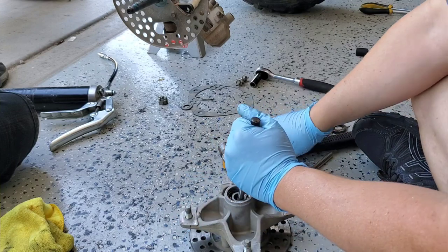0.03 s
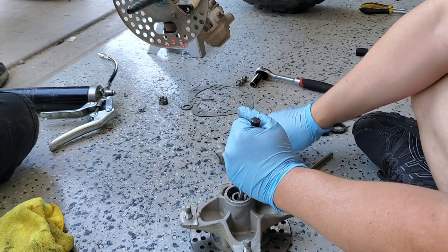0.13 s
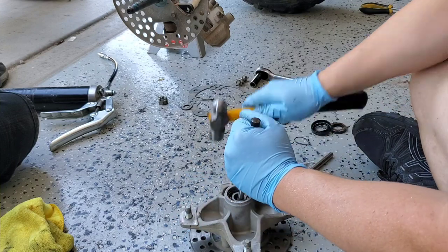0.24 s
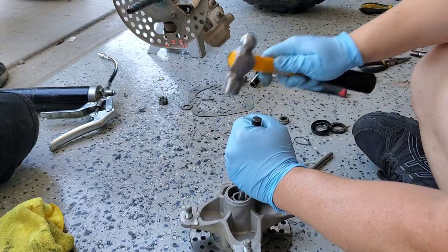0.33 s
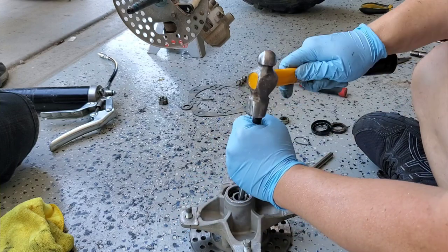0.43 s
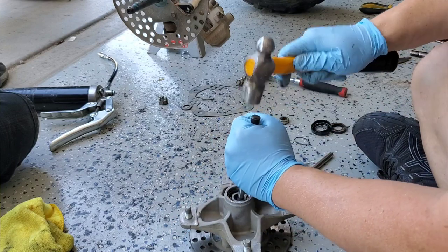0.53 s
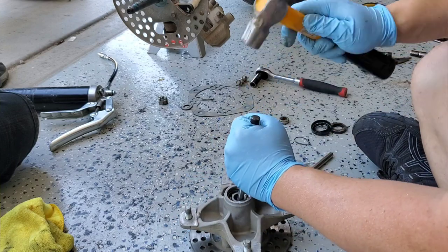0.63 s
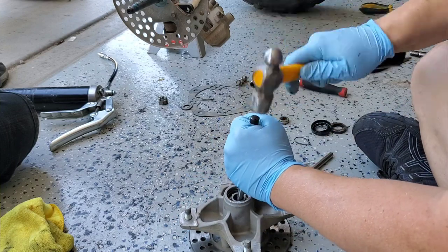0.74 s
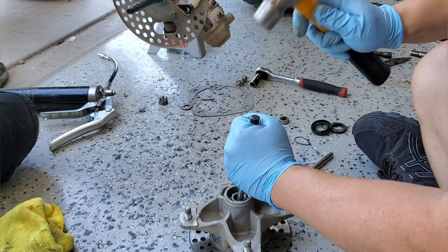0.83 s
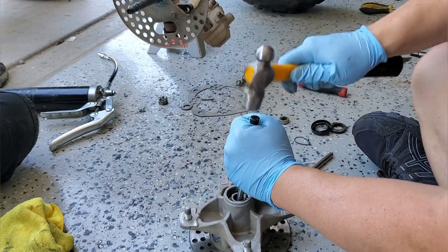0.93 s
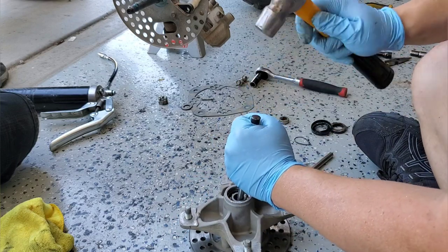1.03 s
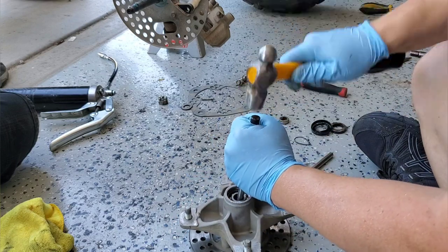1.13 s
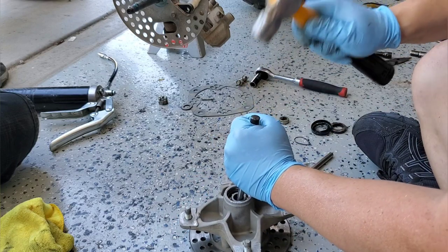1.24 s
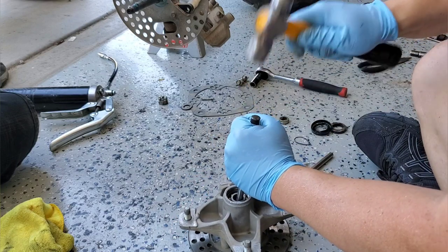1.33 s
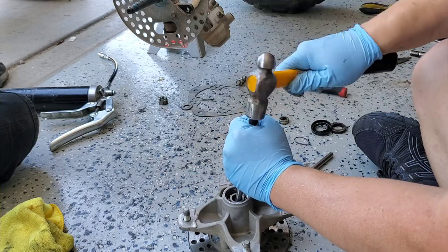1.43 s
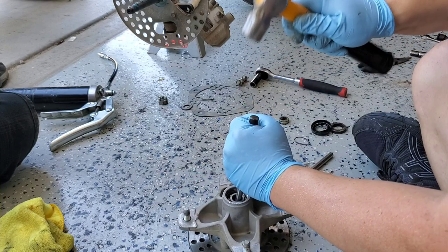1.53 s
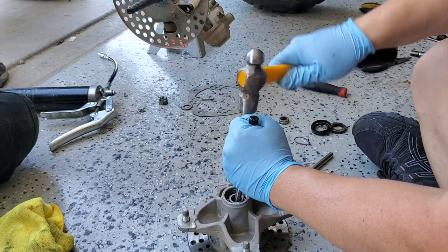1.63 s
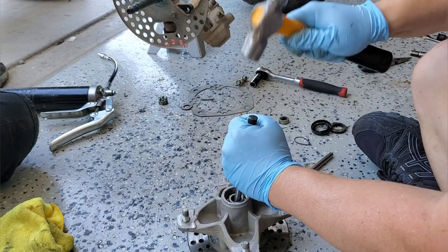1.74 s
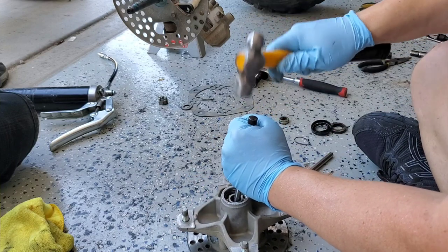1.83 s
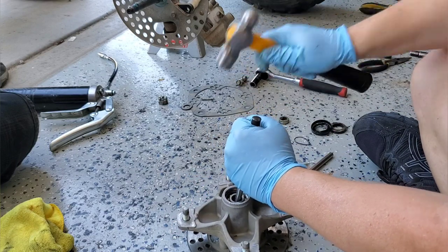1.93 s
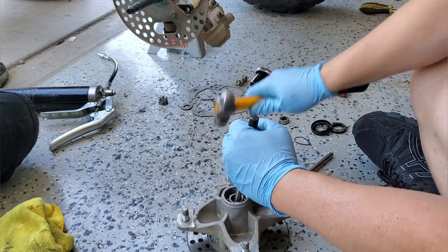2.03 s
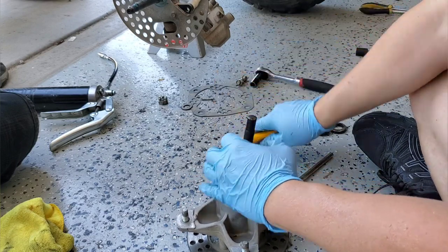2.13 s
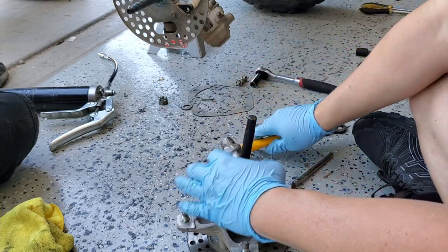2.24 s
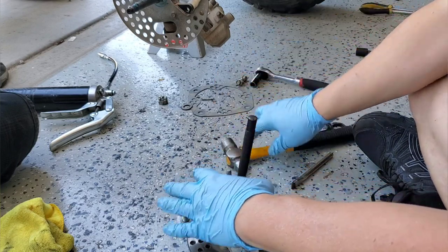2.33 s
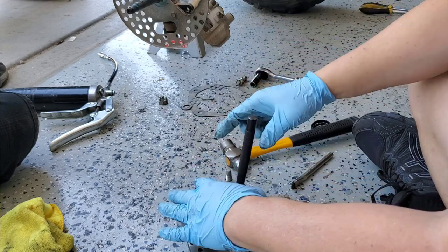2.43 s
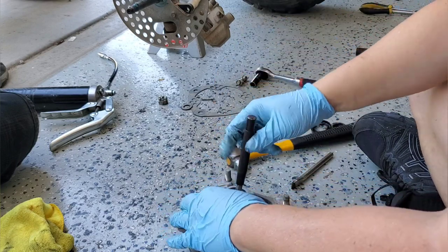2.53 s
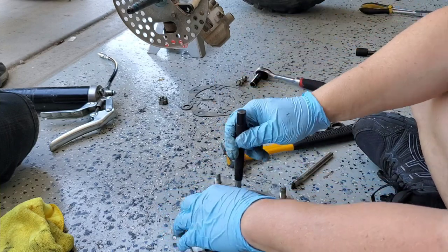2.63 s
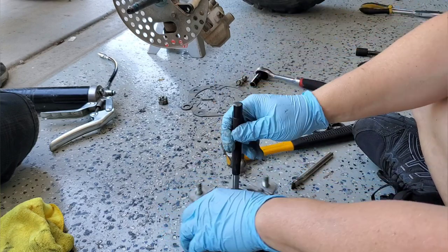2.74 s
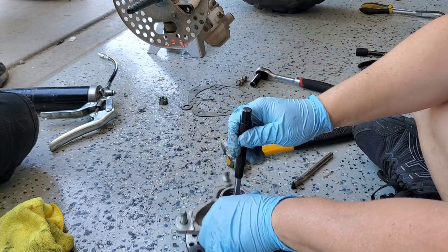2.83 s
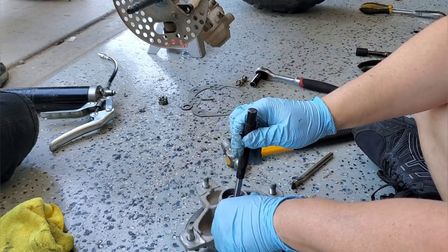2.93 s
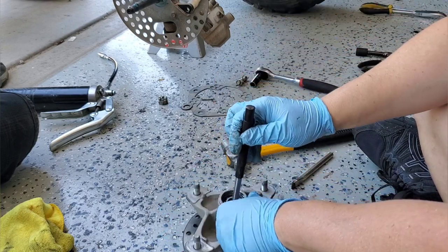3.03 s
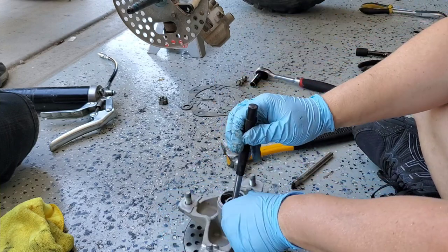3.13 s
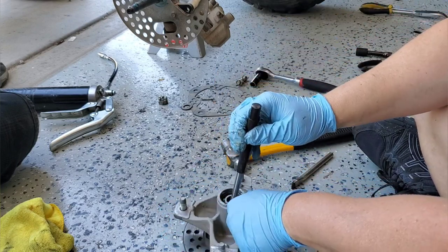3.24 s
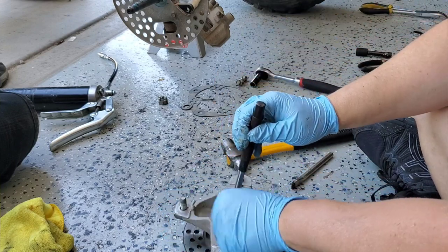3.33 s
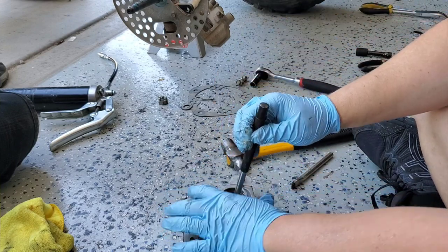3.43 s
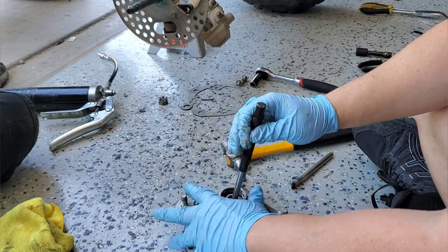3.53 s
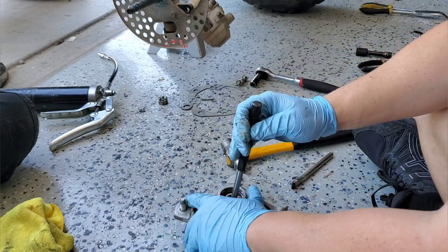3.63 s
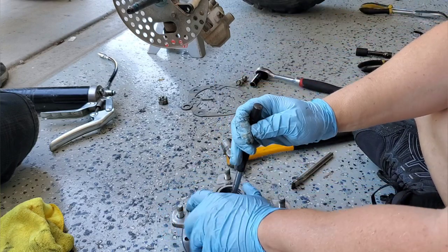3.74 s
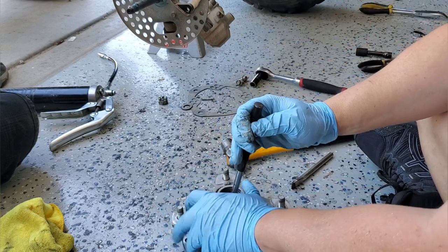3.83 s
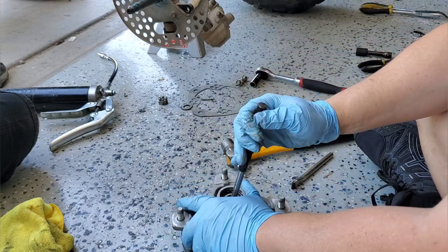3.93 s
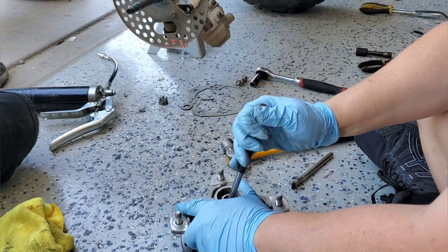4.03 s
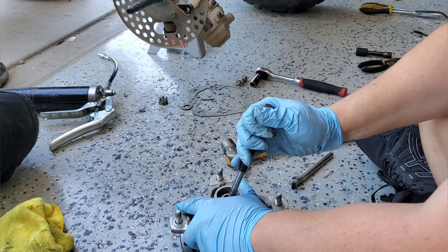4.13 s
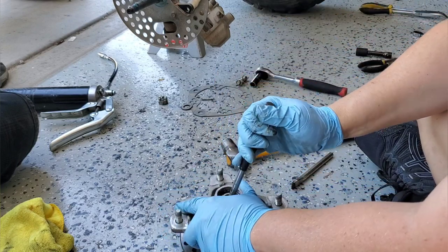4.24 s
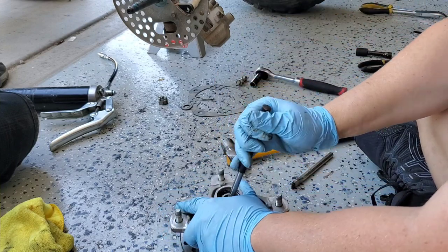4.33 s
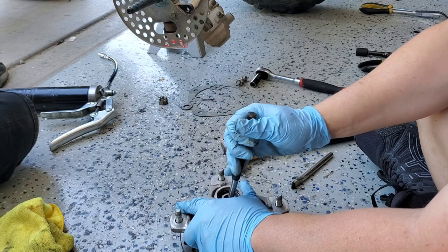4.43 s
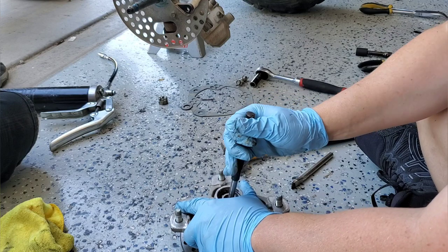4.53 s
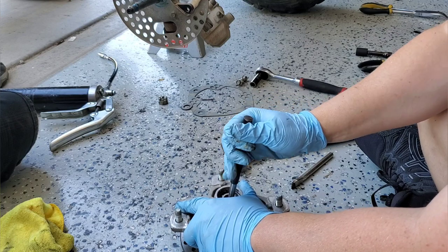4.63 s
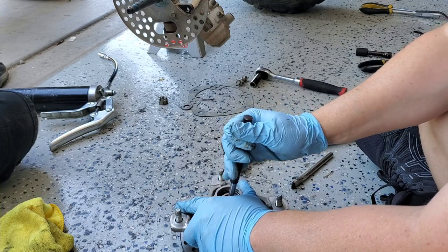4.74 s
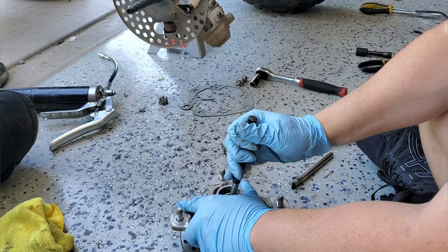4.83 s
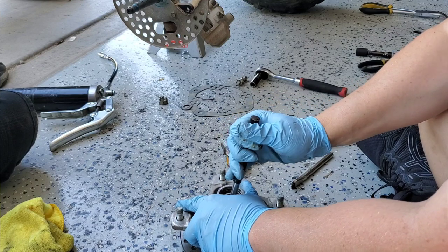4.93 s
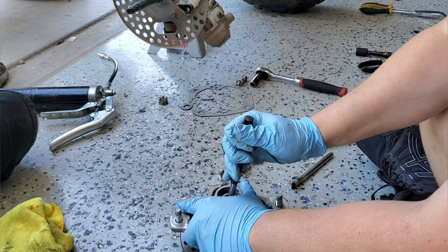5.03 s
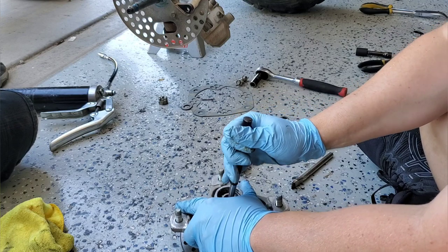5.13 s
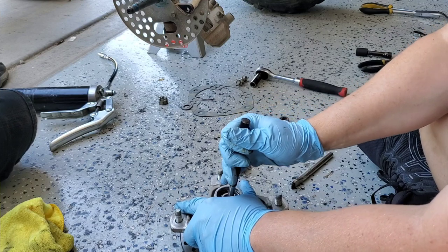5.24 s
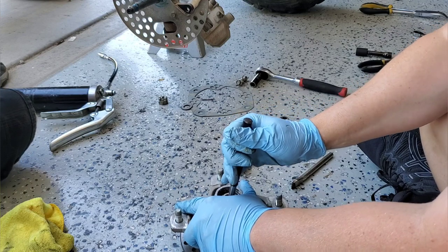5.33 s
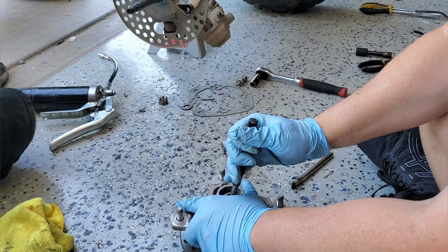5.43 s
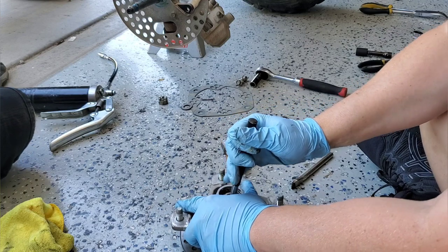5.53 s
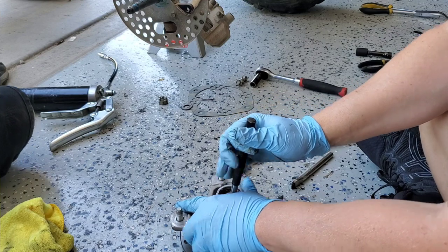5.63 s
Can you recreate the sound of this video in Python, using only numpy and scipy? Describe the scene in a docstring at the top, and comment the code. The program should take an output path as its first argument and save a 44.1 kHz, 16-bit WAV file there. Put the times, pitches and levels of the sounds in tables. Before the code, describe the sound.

Close by in a garage, eight loud, bright hammer strikes ring off a steel punch, about five a second. As the ringing fades, the hammer knocks softly onto the concrete floor. Quiet metallic clicks and scrapes follow as the punch shifts in a wheel hub, with one sharper click and finally a hollow metal clunk. Rubber gloves rustle faintly over a distant motor hum.

```python
"""A hammer drives a steel punch against the bearing in a wheel hub on a garage floor: eight ringing blows, each
a noisy clank plus the modes of hammer, punch and hub. The hammer is laid on the concrete; the punch ticks and
scrapes about in the bore and finally levers the sleeve sideways, so that it jumps in the bore with a hollow
clunk. Gloves rustle, a motor hums far off in a low rumble, and a limiter ducks under the blows."""
import sys
import numpy as np
from scipy import signal
from scipy.fft import rfft, irfft
from scipy.io import wavfile
from scipy.ndimage import uniform_filter1d, minimum_filter1d

SR = 44100
rng = np.random.default_rng(int(sys.argv[2]) if len(sys.argv) > 2 else 0)


def unload_audio(sound):
    """Save the sound as a 16-bit wav file, at the path given as the first command line argument."""
    columns = np.transpose(np.atleast_2d(sound))
    # keep every value between -1 and 1, then stretch to whole-number steps
    steps = np.round(np.clip(columns, -1, 1) * 32767)
    wavfile.write(sys.argv[1], SR, steps.astype(np.int16))


N = 251370
TIME = np.arange(N) / SR

# modes of the steel punch, the hub and the air in the bore: f/Hz, level/dB, t60/s, left minus right/dB
PUNCH_MODES = [(4990, -40, .22, 12), (5469, -26, .25, 10), (5641, -19, .25, 13), (5738, -31, .7, 10),
               (8758, -23, .22, 10), (10109, -18, .24, -6), (12187, -24, .27, 12), (13102, -24, .23, 4)]
HUB_MODES = [(1757, -51.5, 3.6, 0), (3768, -22, .27, 11), (3913, -28, .25, 12), (4013, -43, 2.0, 8),
             (5292, -41, .8, 3), (5662, -43, 2.0, 9), (7181, -38, .25, 7), (8403, -29, .2, -2),
             (8532, -28, .2, 0), (9240, -20, .19, -1), (9383, -27, .24, -7), (9668, -32, .26, 6),
             (9781, -27, .21, 10), (11622, -31, .2, 5), (11875, -30, .22, 7), (12360, -24, .2, 8),
             (14798, -32, .22, 2), (14841, -37, .26, 10), (15606, -32, .2, 3), (15735, -36, .22, -3)]
BORE_MODES = [(1120, 2, .055, 6), (1215, -4, .04, 6), (1390, -10, .03, 6), (1560, -5, .04, 6),
              (1790, -11, .03, 6)]
# stereo balance of the two microphone ports: f/Hz, left minus right/dB
PORT_BALANCE = [(100, 1), (300, 2), (1200, 2.4), (2400, 14), (4200, 3), (7000, 12), (9500, 8.3),
                (15000, 13)]
# how alike the two ports sound: f/Hz, correlation/0-1
PORT_LIKENESS = [(100, 0.93), (300, 0.83), (700, 0.23), (2000, 0.39), (4500, 0.18), (15000, 0.047)]
SHAFT_TILT_DB = -16   # per octave: the punch rings darker when it is not hammered


def from_db(db):
    """Decibels to gain."""
    return 10 ** (np.asarray(db) / 20)


def between(ends, share):
    """A value part of the way from one end to the other."""
    return ends[0] + (ends[1] - ends[0]) * np.clip(share, 0, 1)


def at_hz(points, hz):
    """Read a table on a log-frequency axis."""
    freqs, values = np.transpose(points)
    return np.interp(np.log(hz + 1), np.log(freqs), values)


def panned(db):
    """Left and right gains for a level difference."""
    return from_db(np.array([[.5], [-.5]]) * db)


def fade(t, t60):
    """Free decay: 60 dB in t60 seconds."""
    return np.exp(-np.log(1000) * t / t60)


def drift(per_s):
    """A random wander of spread about 1."""
    return np.interp(TIME * per_s, np.arange(4096), rng.standard_normal(4096))


def add(out, s, sound):
    """Mix a sound in from a given moment."""
    start = round(s * SR)
    out[:, start:start + sound.shape[1]] += sound[:, :N - start]


def dull(x, edge_hz):
    """Roll the treble off gently."""
    return signal.sosfilt(signal.butter(1, edge_hz, fs=SR, output="sos"), x)


def thin(x, edge_hz=950):
    """Small parts and narrow openings radiate little bass."""
    return signal.sosfilt(signal.butter(3, edge_hz, "high", fs=SR, output="sos"), x + 1e-18)


def noise(spectrum, size):
    """Stereo noise of a given colour as the two ports hear it; about rms 1."""
    hz = np.arange(size // 2 + 1) * SR / size
    mid, side = rfft(rng.standard_normal((2, size)))
    alike = at_hz(PORT_LIKENESS, hz)
    colour = from_db(at_hz(spectrum, hz))
    ports = np.sqrt((1 + alike) / 2) * mid + np.sqrt((1 - alike) / 2) * side * [[1], [-1]]
    return irfft(ports * panned(at_hz(PORT_BALANCE, hz)) * colour / np.sqrt(np.mean(colour ** 2)), size)


def burst(spectrum, t60, tilt_db=0):
    """Countless damped modes struck at once: fast-dying noise, its colour tilted by tilt_db an octave."""
    size = 8192
    hz, t = np.arange(size // 2 + 1) * SR / size, TIME[:size]
    envelope = fade(t, t60) * (1 - np.exp(-t / .0004))
    strike = rfft(noise([(100, 0), (16000, 0)], size) * envelope)
    power = uniform_filter1d(np.abs(strike) ** 2, size=25)
    even = strike * np.sqrt(power.mean() / power)   # iron out chance peaks and dips
    colour = from_db(at_hz(spectrum, hz) + tilt_db * np.log2(hz + 1))
    colour /= np.sqrt(np.mean(colour ** 2))
    return irfft(even * colour * panned(at_hz(PORT_BALANCE, hz)))[:, :size // 2]


def ring(modes, scatter_db=1.3, tilt_db=0, hold=1):
    """One stroke on a body: mode levels scatter and tilt (dB per octave); hold scales the ring time."""
    longest_s = max(mode[2] for mode in modes) * hold
    t = TIME[:int(min(longest_s, 2) * SR)]
    out = np.zeros((2, len(t)))
    for (hz, db, t60, pan_db), (luck, lag) in zip(modes, rng.standard_normal((len(modes), 2))):
        age = t[:int(t60 * hold * SR) + 1]
        # short waves reach the two ports out of step
        skew = lag * np.arccos(at_hz(PORT_LIKENESS, hz)) * np.array([[.5], [-.5]])
        gain = from_db(db + scatter_db * luck + tilt_db * np.log2(hz / 5000)) * panned(pan_db)
        out[:, :len(age)] += gain * fade(age, t60 * hold) * np.sin(2 * np.pi * hz * age + skew)
    return out


def background(waver_rad=0.69):
    """A bed of low rumble with the wavering hum of a distant motor in it."""
    # colour of the rumble: f/Hz, level/dB
    rumble_colour = [(20, -7.5), (40, -14.5), (62, 3), (100, -4), (200, -9.5), (350, -20), (900, -25),
                     (2500, -52.5), (8000, -55.5), (16000, -52.5)]
    # motor partials against the rumble: f/Hz, level/dB
    partials = [(59.5, -6), (119, -9.5)]
    # fader ride of the whole bed: t/s, level/dB
    ride = [(0.0, -52), (0.35, -57), (0.7, -50.5), (0.75, -59.5), (1.82, -59), (2.63, -69), (3.75, -53),
            (5.59, -53.5), (5.7, -60)]
    hum = sum(from_db(db) * np.sqrt(2) * np.sin(2 * np.pi * hz * TIME + waver_rad * drift(17))
              for hz, db in partials)
    level_db = np.interp(TIME, *np.transpose(ride))
    return from_db(level_db) * (noise(rumble_colour, N) + hum)


def gloves(rise_s=0.041, fall_s=0.081, uneven_db=1, grain_db=2.5, hiss_db=-76):
    """Rubber rubs on skin and steel: each rustle swells, holds and dies away, over a faint steady hiss."""
    # the hands take a new grip, and at 4.39 s a brief rustle goes with the tip's scrape: t/s, length/s,
    # level/dB
    grips = [(0, 0.28, -63), (1.866, 0.12, -58), (3.404, 0.21, -65), (3.672, 0.29, -54.5),
             (4.391, 0.02, -53), (5.661, .1, -59.5)]
    # colour of rubbing rubber: f/Hz, level/dB
    rub_colour = [(150, 5.5), (500, -1.5), (1400, -0.5), (2500, -4.5), (4500, 0), (7000, -5), (12000, -6),
                  (16000, -14)]
    rub = np.zeros(N)
    for s, length, db in grips:
        swell = np.minimum((TIME - s) / rise_s, 0)
        ebb = np.minimum((s + length - TIME) / fall_s, 0)
        rub += from_db(db) * np.exp(swell + ebb)
    texture = from_db(uneven_db * drift(per_s=18) + grain_db * drift(per_s=240))
    return np.hypot(rub * texture, from_db(hiss_db)) * noise(rub_colour, N)


def garage(x, low_t60=0.29, high_t60=0.16, echo_s=.0113, echo_db=-9, tail_db=-1):
    """The room answers with a dull first echo and a diffuse tail whose treble dies sooner."""
    t = TIME[:SR * 2 // 3]
    white = rng.standard_normal((3, len(t)))
    air = white[:2] + dull(white[2] - white[:2], edge_hz=1500)   # long waves reach both ports alike
    low = dull(air, edge_hz=3500)
    onset = 1 - np.exp(-(t / 0.001) ** 2)
    tail = (low * fade(t, low_t60) + (air - low) * fade(t, high_t60)) * onset
    tail *= from_db(tail_db) / np.sqrt(np.sum(tail ** 2) / 2)
    echo = np.zeros(len(t))
    echo[round(echo_s * SR)] = from_db(echo_db)
    return signal.fftconvolve(x, tail + dull(echo, edge_hz=3500), axes=1)[:, :N]


def hammer_laid_down():
    """Head and handle knock dully on the concrete."""
    # contacts with the floor: t/s, level/dB
    knocks = [(2.178, -28.5), (2.268, -43), (2.308, -31), (2.325, -39.5), (2.369, -36), (2.381, -39),
              (2.567, -55)]
    # colour of a knock on concrete: f/Hz, level/dB
    knock_colour = [(100, -30), (300, -1.5), (800, -4.5), (1700, 0.5), (2500, 0), (3700, 1), (5500, -5.5),
                    (7600, -14), (11000, -13.5), (16000, -29)]
    out = np.zeros((2, N))
    for s, db in knocks:
        add(out, s, from_db(db) * burst(knock_colour, t60=0.033))
    return out


def slips(length, catches_per_s=1400):
    """Force of a sliding tip: uneven small catches that swell and ebb; a brief touch is one click."""
    draws = rng.random((2, SR // 4))
    if length < .003:
        return np.ones((1, 1))
    chance, height = draws[:, :int(length * SR)]
    catches = (chance < catches_per_s / SR) * (2 * height - 1) ** 3
    force = catches * np.sqrt(np.hanning(len(chance)))
    return force[None] / np.sqrt(np.sum(force ** 2) + 1e-12)


def punch_in_bore(grip_s=0.088, slide_loss_db_per_s=100, rasp_db=2, drag_click_db=-9, fingertip_hold=2.3):
    """The tip ticks and scrapes on the spacer sleeve; the air in the bore answers with a hollow note."""
    # contacts of the tip: t/s, sliding time/s, level/dB, wedged/0-1
    touches = [(0.462, .02, -55, .5), (2.666, 0.0062, -50.5, 0), (2.7149, .001, -43.5, 0),
               (2.864, 0.018, -51.5, 0), (2.913, .001, -53, .1), (3.073, .08, -44.5, .1),
               (3.169, .05, -53.5, 0), (3.235, .001, -41.5, .2), (4.056, .01, -50, .9),
               (4.0716, .001, -21.5, 0.77), (4.185, .001, -51, .8), (4.365, .125, -31.5, .7),
               (4.398, .001, -42, 1), (4.604, 0.044, -46.5, 1), (4.899, .04, -65, .9),
               (5.168, .026, -44, 1)]
    # colour of the tip's own click: f/Hz, level/dB
    click_colour = [(150, -12.5), (400, -4), (900, -2.5), (1200, 8), (1900, 6.5), (2600, -3), (3900, 13),
                    (4500, 1.5), (7000, 5.5), (9000, -12.5), (16000, -16)]
    # modes of the sleeve and of the rasping, loaded punch: f/Hz, level/dB, t60/s, left minus right/dB
    sleeve_modes = [(1080, -12, .45, 4), (3600, -5, .14, 8), (3850, -10, .12, 8), (3935, -5, .14, 8),
                    (6545, -6, .13, 8), (8540, -17, .18, 4), (10900, -22, .16, 4), (11600, -18, .18, 4),
                    (15300, -28, .15, 4)]
    rasp_modes = [(1210, -5.5, .06, 5.5), (1450, -5, .008, 0.5), (2820, -9.5, 0.043, 6),
                  (4530, 1, 0.0088, 11), (6640, -3.5, 0.0076, 7), (8540, -9.5, 0.058, 2.5),
                  (11600, -22, .07, 3.5), (12200, -22.5, .07, 6)]
    # (free, wedged): wedging stills the sleeve and brings out bore and punch
    sleeve_db, bore_db, shaft_db, click_db = (6.5, -24), (-21.5, 6), (1, 2.5), (-1.5, 1)
    hub_db, hub_tilt_db = (3, 4), (-13, 0)
    clicks, hollow, rings = np.zeros((3, 2, N))
    for s, length, db, wedged in touches:
        force = from_db(db) * slips(length)
        hold = 1 / (1 + length / grip_s)   # a tip that stays in contact damps the metal
        drag = np.clip(wedged * length / grip_s, 0, 1)   # dragged under load, it trades click for rasp
        click_gain = from_db(between(click_db, wedged) + drag_click_db * drag)
        add(clicks, s, click_gain * signal.fftconvolve(burst(click_colour, t60=0.048), force))
        add(hollow, s, drag * from_db(rasp_db) * signal.fftconvolve(ring(rasp_modes), force))
        loss_db = slide_loss_db_per_s * length   # a long slide hardly stirs the heavy parts
        shaft_hold = hold * fingertip_hold   # the punch rings longer in the fingertips than in the fist
        bodies = ((sleeve_modes, between(sleeve_db, wedged), 0, hold, rings),
                  (BORE_MODES, between(bore_db, wedged), 0, hold, hollow),
                  (PUNCH_MODES, between(shaft_db, wedged) - loss_db, SHAFT_TILT_DB, shaft_hold, rings),
                  (HUB_MODES, between(hub_db, wedged) - loss_db, between(hub_tilt_db, wedged),
                   hold, rings))
        for modes, body_db, tilt_db, body_hold, bus in bodies:
            tone = ring(modes, tilt_db=tilt_db, hold=body_hold)
            add(bus, s, from_db(body_db) * signal.fftconvolve(tone, force))
    return clicks + thin(hollow), rings


def snap(s=5.1966, knock_db=-12, bore_db=-5, hub_db=-14, punch_db=-21, swell_s=.0017):
    """Levered sideways, the sleeve jumps in the bore: a hollow clunk, the hub muted by the hand on it."""
    # colour of the sleeve's hollow knock: f/Hz, level/dB
    knock_colour = [(120, -40.5), (260, -22.5), (370, -6), (600, -19), (900, -25), (1100, 9), (1750, 1.5),
                    (2400, -23), (3800, -20.5), (5500, -21.5), (11000, -22.5), (16000, -36.5)]
    out = np.zeros((2, N))
    hollow = ring(BORE_MODES, scatter_db=.7)
    swell = 1 - np.exp(-TIME[:hollow.shape[1]] / swell_s)   # the air in the bore takes a moment to answer
    add(out, s, from_db(knock_db) * burst(knock_colour, t60=0.065))
    add(out, s, from_db(bore_db) * hollow * swell)
    add(out, s, from_db(hub_db) * ring(HUB_MODES, tilt_db=-0.5, hold=0.3))
    add(out, s, from_db(punch_db) * ring(PUNCH_MODES, tilt_db=SHAFT_TILT_DB, hold=0.67))
    return out


def thwack(pulse_hz=1600, t60=0.0033, pan_db=6):
    """The sudden stop of the hammer head throws off a cycle or two of pressure."""
    t = TIME[:SR // 100]
    envelope = fade(t, t60) * (1 - np.exp(-t / .0004))
    return panned(pan_db) * np.sin(2 * np.pi * pulse_hz * t) * envelope


def hammering(clank_db=-5.5, thwack_db=8, hub_db=0.5, punch_db=-6.5, punch_tilt_db=5.5):
    """Each blow clanks, stops the ringing of the one before and sets hammer, punch and hub going anew."""
    # hammer blows: t/s, level/dB, hammer ring/dB, looseness of the punch/0-1
    blows = [(.5000, -9, 2, 0.72), (0.733, -0.5, 4.5, 0.4), (.9286, -3, 0.5, 0.2), (1.1095, -2, 7.5, 0.03),
             (1.2895, -2, 5.5, 0), (1.4659, -3, 4, 0), (1.643, -4, 12.5, 0), (1.825, -5, 1.5, 0.16)]
    # modes of the hammer: f/Hz, level/dB, t60/s, left minus right/dB
    hammer_modes = [(2594.5, -27.5, 1.1, 5), (7558, -41, .55, 6), (13813, -40, .42, 3),
                    (14206, -49, .42, 6)]
    # colour of the steel-on-steel attack: f/Hz, level/dB
    clank_colour = [(100, -39.5), (250, -17.5), (400, -11), (600, -12), (930, -26), (1060, 0.5),
                    (1950, 0.5), (2900, -8), (3450, -9.5), (3850, 8.5), (4500, -9.5), (7200, -9.5),
                    (9400, -4.5), (10900, -7), (12300, -1), (13800, -12), (15500, -11)]
    # a loose punch dulls the blow and rings louder in its lowest modes (tilts in dB per octave)
    loose_tilt_db, loose_punch_db, loose_punch_tilt_db = -3.5, 22, -19.5
    clanks, rings = np.zeros((2, 2, N))
    stops = [blow[0] for blow in blows[1:]] + [TIME[-1]]
    for (s, db, hammer_db, loose), stop in zip(blows, stops):
        tilt_db = loose_tilt_db * loose
        add(clanks, s, from_db(db + clank_db) * burst(clank_colour, t60=0.028, tilt_db=tilt_db))
        add(clanks, s, from_db(db + clank_db + thwack_db) * thin(thwack()))
        bodies = ((hammer_modes, hammer_db, tilt_db),
                  (HUB_MODES, db + hub_db, tilt_db),
                  (PUNCH_MODES, db + punch_db + loose_punch_db * loose,
                   punch_tilt_db + loose_punch_tilt_db * loose))
        for modes, body_db, body_tilt_db in bodies:
            tone = ring(modes, tilt_db=body_tilt_db)
            add(rings, s, from_db(body_db) * tone[:, :round((stop - s) * SR)])
    return clanks, rings


def scene(ring_room_db=-9, floor_room_db=-6, bore_room_db=-8, snap_room_db=-10):
    """The clanks fill the garage; the ringing and the sounds in the bore or on the floor stay drier."""
    clanks, rings = hammering()
    clicks, tinkles = punch_in_bore()
    sources = [(clanks, 0), (thin(rings + tinkles), ring_room_db), (clicks, bore_room_db),
               (hammer_laid_down(), floor_room_db), (snap(), snap_room_db)]
    direct = sum(sound for sound, room_db in sources)
    room_send = sum(from_db(room_db) * sound for sound, room_db in sources)
    return direct + garage(room_send) + gloves() + background()


def record(dry, ceiling_db=-1.0, release_db_per_s=130, cutoff_hz=15800):
    """A peak limiter ducks just ahead of each loud peak and recovers steadily; the top is cut."""
    peak_db = 20 * np.log10(np.maximum(np.abs(dry).max(axis=0), 1e-9))
    over_db = np.maximum(peak_db - ceiling_db, 0)
    recovery_db = release_db_per_s * TIME
    duck_db = np.maximum.accumulate(over_db + recovery_db) - recovery_db
    gain_db = uniform_filter1d(minimum_filter1d(-duck_db, size=64), size=64)   # smooth look-ahead
    top_cut = signal.ellip(10, .2, 80, cutoff_hz, fs=SR, output="sos")
    return signal.sosfilt(top_cut, dry * from_db(gain_db))


dry = scene()
out = record(dry)
unload_audio(out)
```